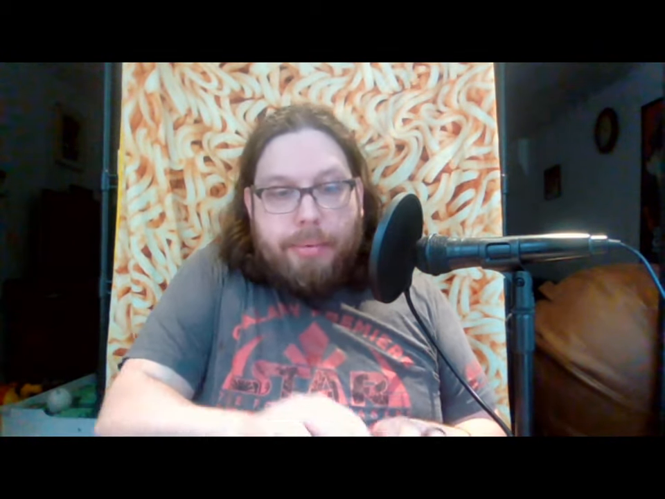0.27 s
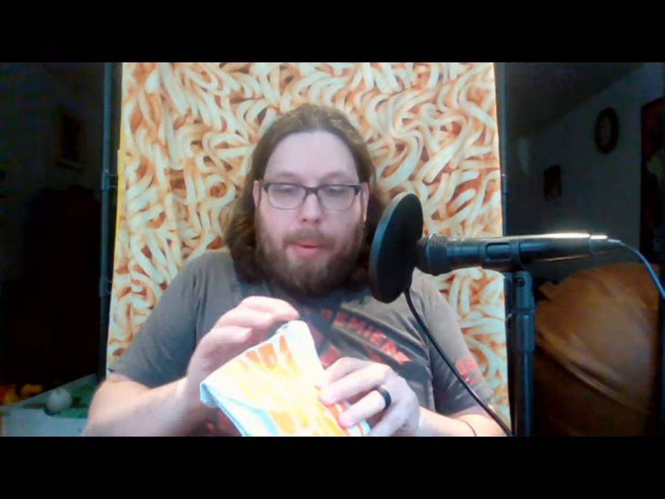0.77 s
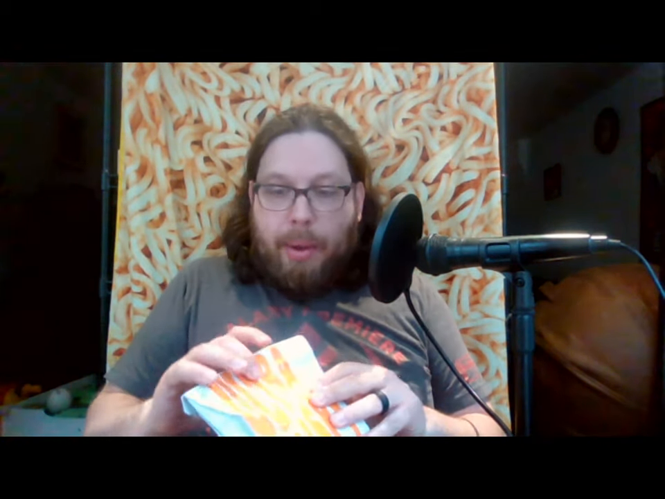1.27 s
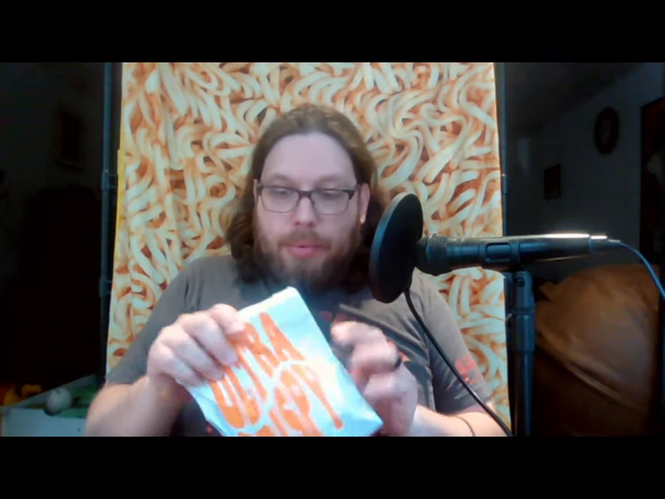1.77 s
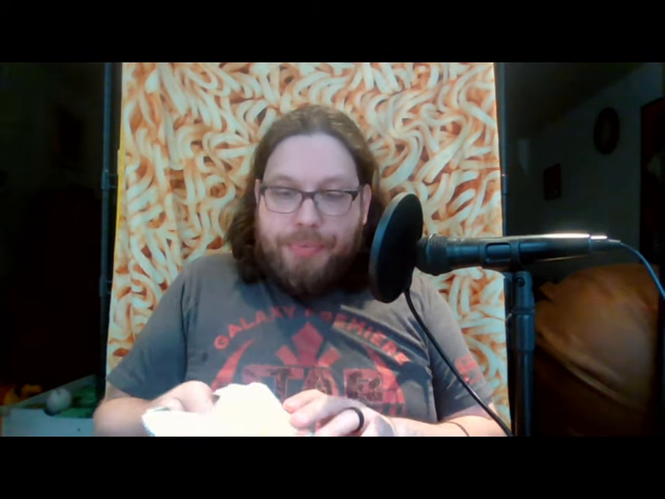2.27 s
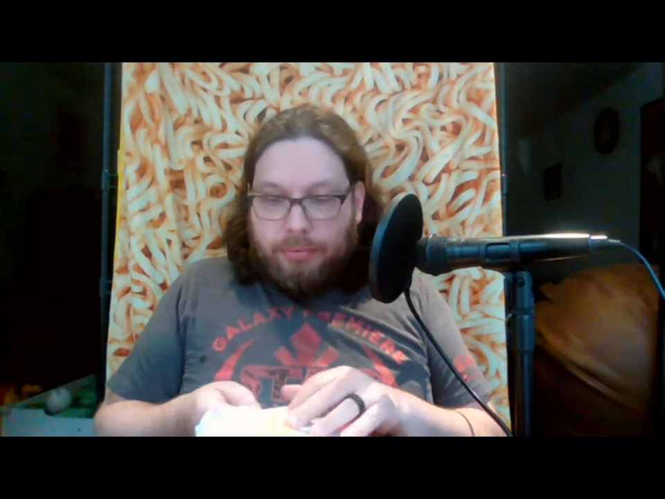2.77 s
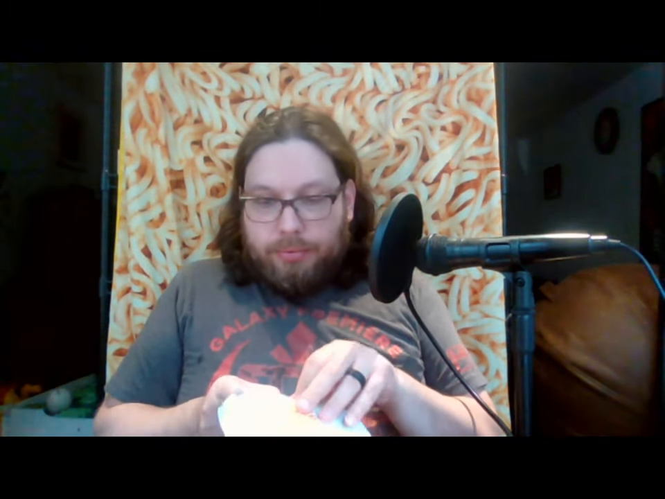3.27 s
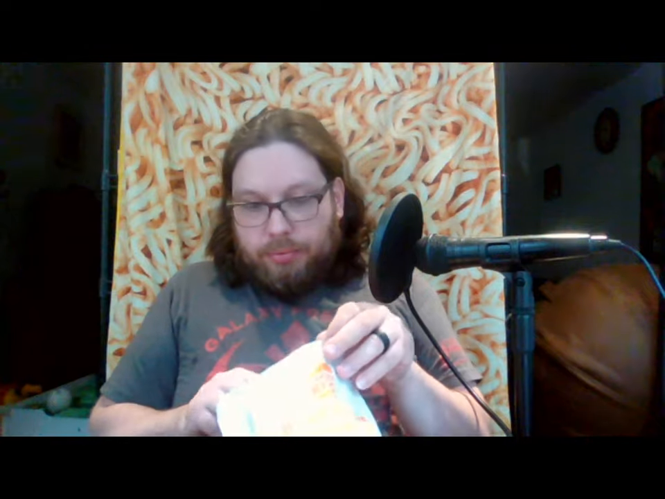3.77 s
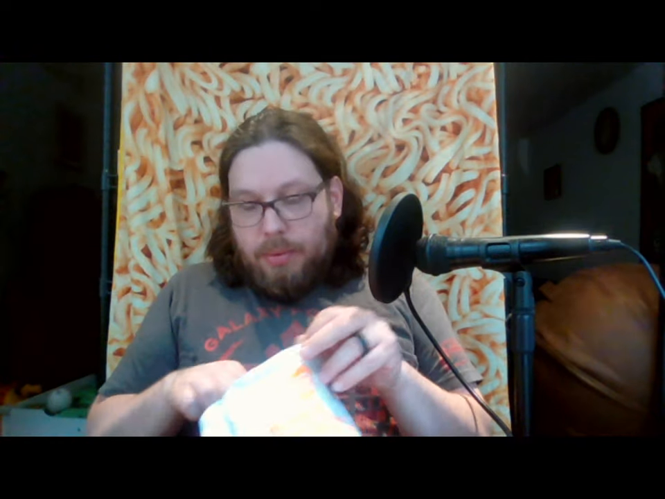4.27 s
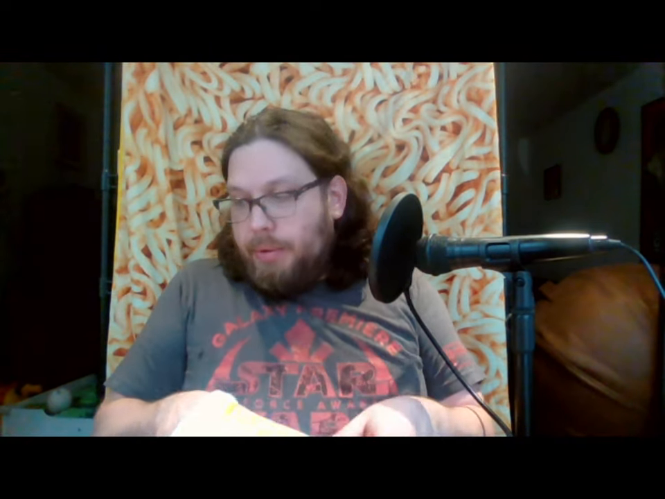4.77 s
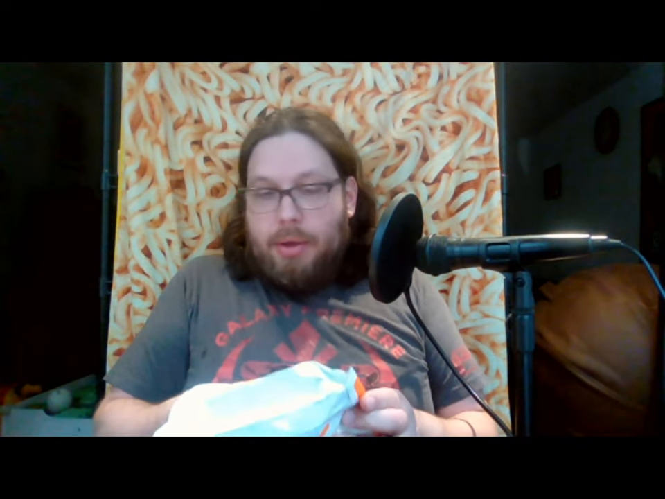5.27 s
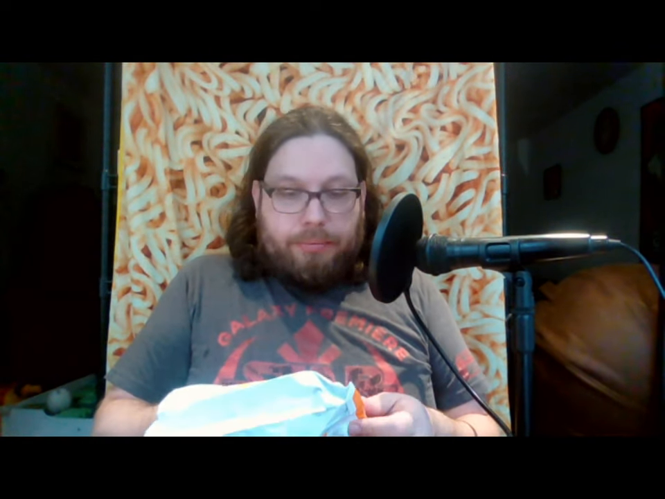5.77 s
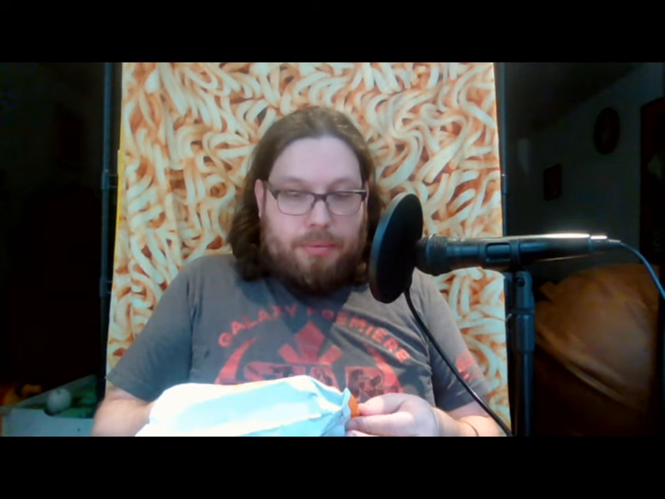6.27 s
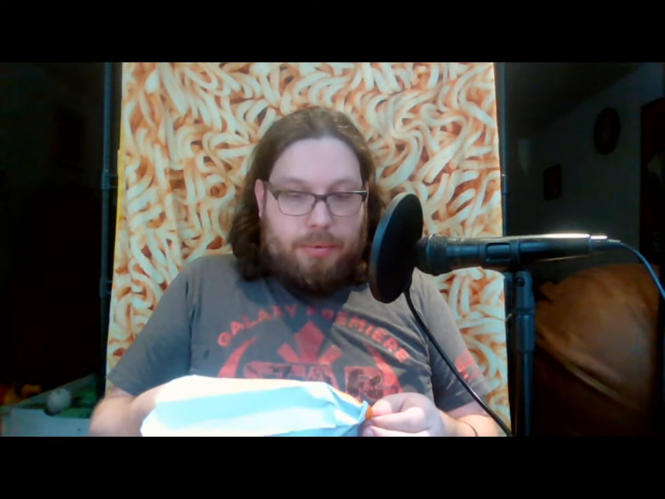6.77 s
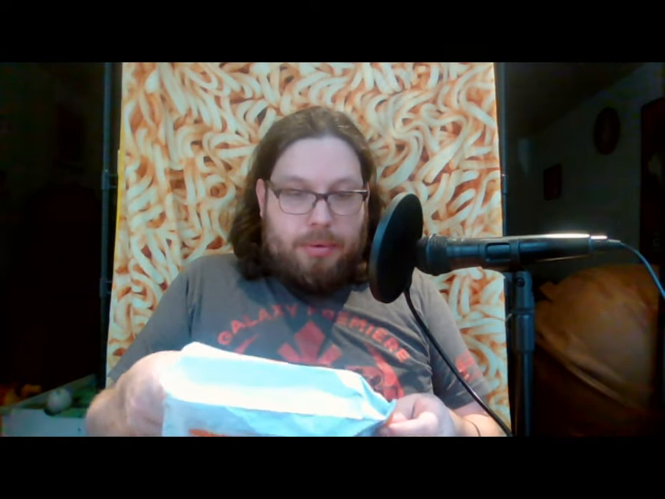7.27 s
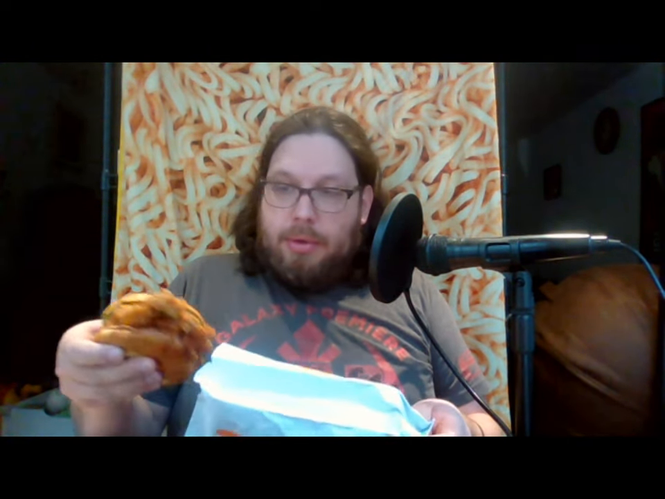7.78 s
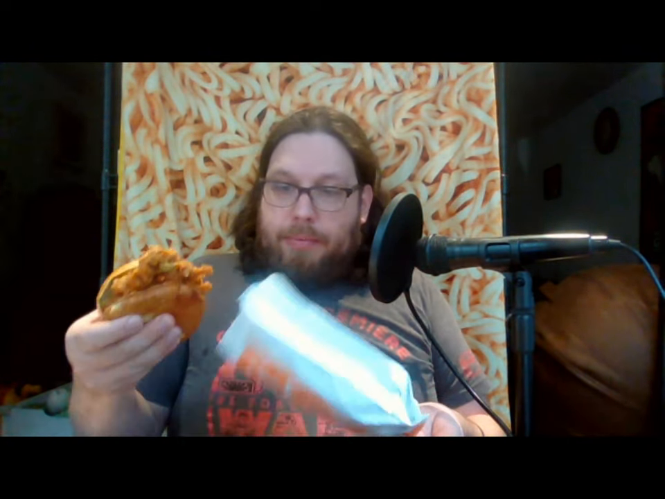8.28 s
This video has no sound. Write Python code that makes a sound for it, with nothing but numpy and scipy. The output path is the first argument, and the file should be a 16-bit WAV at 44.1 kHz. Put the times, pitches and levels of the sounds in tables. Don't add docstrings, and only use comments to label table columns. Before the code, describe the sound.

Waxed paper bag crackles and rustles close to the microphone in a quiet room, with desk thumps and an engine swelling outside before fading.

```python
import sys
import numpy as np
from scipy import signal
from scipy.fft import rfft, irfft, next_fast_len
from scipy.io import wavfile
from scipy.ndimage import uniform_filter1d

SR = 44100
rng = np.random.default_rng(int(sys.argv[2]) if len(sys.argv) > 2 else 0)


def attenuation_scalar(level_db):
    decades = np.asarray(level_db, float) / 20
    return 10 ** decades


def pcm_store(signal):
    levels = np.round(np.clip(np.atleast_2d(signal), -1, 1) * 32767)
    wavfile.write(sys.argv[1], SR, levels.astype(np.int16).T)


N = 375633

# (frequency [Hz], width [Hz], level [dB])
BAG_MODES = [(471.4, 123, 10.5), (787, 1500, -4.5), (1174, 910, -2)]


def noise():
    return rng.standard_normal(N)


def evened(x):
    return x / np.sqrt(np.mean(x ** 2) + 1e-20)


def add(mix, s, sound):
    part = mix[max(round(s * SR), 0):][:len(sound)]
    part += sound[:len(part)]


def curves(rows):
    s, *columns = np.transpose(rows)
    return [np.interp(np.arange(N) / SR, s, c) for c in columns]


def read(points, hz):
    f, value = np.transpose(points)
    return np.interp(np.log(hz + 1), np.log(f + 1), value)


def colour(x, points):
    size = next_fast_len(len(x))
    gain = attenuation_scalar(read(points, np.fft.rfftfreq(size, 1 / SR)))
    return evened(irfft(rfft(x, size) * gain, size)[:len(x)])


def ring(x, modes):
    out = 0
    for hz, width_hz, db in modes:
        out = out + attenuation_scalar(db) * signal.lfilter(*signal.iirpeak(hz, hz / width_hz, SR), x)
    return out


def band(x, lo_hz, hi_hz):
    y = signal.sosfilt(signal.butter(4, [lo_hz, hi_hz], "bandpass", fs=SR, output="sos"), x)
    return y / abs(y).max(axis=-1, keepdims=True)


def flutter(hz, db):
    slow = signal.lfilter(*signal.butter(2, hz, fs=SR), noise())
    return evened(attenuation_scalar(db * evened(slow)))


def swells(rows, rise_s, hold):
    t = np.arange(0, N / SR + .01, .002)
    power = 0
    for s, fall_s, db, *over_db in rows:
        rising = (s - t) / rise_s
        falling = (abs(t - s) / fall_s) ** hold
        shape_db = -20 * np.where(t < s, rising, falling)
        power = power + attenuation_scalar(2 * (db + shape_db + np.array([0] + over_db)[:, None]))
    return [np.interp(np.arange(N) / SR, t, np.sqrt(p)) for p in power]


def room_tone():
    # (frequency [Hz], density [dB per Hz])
    air_spectrum = [(26, -19.5), (45, 6.5), (145, -12), (181, -1), (200, -6), (275, -19.5), (351, -4),
                    (377, -15), (866, -19.5), (1110, -21), (1600, -31), (15500, -55)]
    # (frequency [Hz], level [dB])
    fan_tones = [(344.5, -67), (172.3, -73)]
    air = attenuation_scalar(-54 - 5.5) * colour(noise(), air_spectrum)
    hiss = attenuation_scalar(-86) * noise()
    turning_s = np.cumsum(flutter(hz=2, db=.03)) / SR
    hum = sum(attenuation_scalar(db) * np.sqrt(2) * np.sin(2 * np.pi * hz * turning_s) for hz, db in fan_tones)
    return air + hiss + hum


def engine():
    # (time [s], firing rate [Hz], firing tone [dB], next order up [dB])
    speeding_up = [
        (.8, 99.7, -65, -70),
        (1.0, 102, -58, -60),
        (1.3, 106.4, -58, -52),
        (1.701, 112.6, -60.5, -49.5),
        (2.0, 117.1, -50.5, -52.5),
        (2.301, 124.8, -47, -60.5),
    ]
    # (time [s], firing rate [Hz], firing tone [dB], next order up [dB])
    booming = [
        (2.35, 125.8, -43, -51),
        (2.552, 125.9, -34, -57),
        (2.79, 129.3, -36, -46),
        (3.16, 127.7, -38, -61),
        (3.19, 128.6, -43.5, -60),
        (3.266, 127, -35, -61),
        (3.4, 127.6, -37.5, -61),
        (3.65, 124.5, -62, -69),
    ]
    # (multiple of the cycle [1], level under the next order [dB])
    other_orders = [(4, -38.5), (5, -36.5), (8, -6), (9, -37.5), (10, -24), (12, -11.5)]
    hz, firing_db, next_db = curves([(.7, 98, -90, -90)] + speeding_up + booming + [(3.8, 124, -90, -90)])
    cycle = 2 * np.pi * np.cumsum(hz) / SR / 6
    out = attenuation_scalar(firing_db) * np.sin(6 * cycle)
    out += attenuation_scalar(next_db) * np.sin(7 * cycle)
    for k, db in other_orders:
        out += attenuation_scalar(next_db + db) * np.sin(round(k) * cycle + 6 * rng.random())
    return np.sqrt(2) * out


def leaning():
    # (peak time [s], time to fall 20 dB [s], arm sway [dB], desk rumble over the sway [dB])
    leans = [(.07, .5, -49.5, 3.5), (.19, 0.34, -55.5, 11.5), (.4, .9, -44, -3), (.72, .25, -39.5, 0),
             (.87, 2, -50, 1), (1.6, 4, -54.5, 4.5), (2.29, 0.11, -33, 0.5), (2.32, .8, -30, -21),
             (3.15, 1.4, -46, -6.5), (3.6, 0.6, -41, -9.5), (3.92, 0.44, -60.5, 16.5), (4.2, 0.3, -50, 6),
             (4.515, .35, -35.5, -10.5), (4.77, 0.18, -32.5, -6.5), (4.89, 0.49, -42, 4),
             (5.3, 5.5, -61, 7), (7.235, 0.45, -48, -0.5), (7.5, 1.5, -60.5, 9)]
    # (frequency [Hz], width [Hz], level [dB])
    arm_modes = [(32.54, 3, -10), (62.3, 50, -30)]
    push, shake = swells(leans, rise_s=0.081, hold=0.99)
    sway = evened(ring(ring(noise(), arm_modes), [(37, 35, 0)]))
    lumpy = noise() * flutter(hz=25, db=2)
    rumble = evened(ring(ring(lumpy, DESK_MODES), [(158, 425, 0)]))
    return push * sway + shake * rumble


# (frequency [Hz], width [Hz], level [dB])
DESK_MODES = [(104, 89, -1.5), (130.4, 24, 1), (180, 29, 2), (244, 36, -4), (322, 41, -8)]


def knocks():
    # (time [s], peak level [dB], pitch [Hz], time to fall 60 dB [s])
    bumps = [(.07, -38, 200, .05), (.165, -36, 240, .06), (.52, -36, 150, .06), (5.24, -36, 130, .06),
             (0.671, -30, 180, 0.054), (1.013, -37, 260, 0.048), (1.148, -33, 205, 0.04),
             (1.744, -31.5, 137, 0.069), (2.276, -23.5, 158, 0.059), (2.294, -28, 260, 0.079),
             (4.734, -25.5, 295, 0.081), (4.749, -20, 61.6, 0.2), (4.752, -25, 201, 0.068),
             (4.761, -20.5, 95, 0.054), (4.89, -27, 172, 0.073), (7.217, -26, 194, 0.034),
             (7.402, -40, 116, 0.054)]
    out, t = np.zeros(N), np.arange(9000) / SR
    for s, db, hz, t60 in bumps:
        thud = np.sin(2 * np.pi * hz * t) * attenuation_scalar(-60 * t / max(t60, .02))
        thud = thud * np.minimum(t / 0.0031, 1)
        thud = thud + 5.3 * ring(thud, DESK_MODES)
        add(out, s, attenuation_scalar(db) * thud / abs(thud).max())
    return out


def walls(x):
    # (frequency [Hz], time to fall 60 dB [s])
    decay = [(300, 0.38), (1000, 0.099), (4000, 0.057), (12000, 0.09)]
    taps, at = np.zeros(SR // 2), np.arange(220, SR // 2 - 20, 20)
    taps[at + rng.integers(0, 20, len(at))] = rng.choice([-1., 1.], len(at))
    hz, t, z = signal.stft(taps, SR, nperseg=128)
    fading = attenuation_scalar(-60 * t / read(decay, hz)[:, None])
    tail = signal.istft(z * fading, SR, nperseg=128)[1]
    return signal.fftconvolve(x, tail / np.linalg.norm(tail))[:N]


def crinkle(patches_hz):
    out, grip = np.zeros(N), flutter(hz=35, db=1.6)
    for hz in patches_hz:
        strength = attenuation_scalar(4 * np.minimum(rng.exponential(1, N), 4))
        ticks = strength * (rng.random(N) < 90 / SR)
        ticks = signal.lfilter([1], [1, -.98], ticks)
        drive = (1 + .75 * evened(ticks)) * noise() * grip
        out += ring(drive, [(hz, 0.65 * hz, 0)]) / np.sqrt(hz)
    return out


def rustle():
    # (peak time [s], time to fall 20 dB
    # [s], level [dB], dry skin over the paper [dB])
    finger_strokes = [(.223, 0.3, -61.5, -5), (.36, 0.2, -59, 0), (.45, 0.33, -54.5, 1), (.6, 0.29, -57.5, 4),
                      (.79, 0.08, -58, 6), (.97, 0.15, -57, -3), (1.09, .07, -61, -6), (1.18, 0.09, -58, 0),
                      (1.27, 0.04, -52, 2), (1.36, .06, -60, 5), (1.453, 0.03, -58, -6), (1.598, 0.12, -49.5, -7),
                      (1.69, 0.13, -49.5, -8.5), (1.754, 0.03, -52, -11), (1.834, 0.2, -52.5, -9.5),
                      (1.956, 0.21, -51.5, -3), (2.101, 0.3, -49.5, -9), (2.287, 0.09, -52, -21),
                      (2.5, 0.33, -55.5, -6.5), (2.62, 0.11, -55, -5), (2.769, 0.02, -56, -4.5),
                      (2.845, 0.02, -55, 3), (2.92, .12, -63, -2), (3.03, 0.08, -56, 1), (3.156, .035, -52, -6),
                      (3.21, .08, -64, -2), (3.27, 0.05, -62, 1), (3.35, 0.1, -60, 4), (3.45, .12, -60, 3),
                      (3.615, 0.06, -58, -9), (3.674, .1, -52, -9), (3.791, 0.032, -44.5, -20),
               (3.86, .3, -59.5, -22), (3.93, 0.2, -54, -16), (4.2, 0.091, -59, -6),
               (4.292, 0.094, -54.5, -8.5), (4.408, 0.22, -50.5, -12), (4.8, .04, -49, -12),
               (4.84, 0.05, -46, -12), (4.89, 0.075, -41, -9), (4.98, 0.07, -48, -6), (5.05, .05, -49, -6),
               (5.085, 0.09, -51, -8), (5.19, .05, -55, -10), (5.245, .07, -45, -12), (5.3, .07, -50, -10),
               (5.385, 0.2, -57, -15), (5.591, 0.15, -55.5, -16), (5.84, 0.14, -63, -11),
               (6.062, 0.078, -60.5, -22), (6.285, 0.06, -63, 1), (6.405, 0.075, -65.5, -6.5),
               (6.615, 0.13, -57.5, -17.5), (7.066, 0.18, -69, -12), (7.43, 0.1, -62, -16),
               (7.525, .06, -62, -14), (7.572, 0.09, -57, -14), (7.697, .04, -56, -12),
               (7.778, 0.041, -62, -7), (7.845, 0.07, -65, -20)]
    # (time [s], level [dB])
    squeezing = [(0, -65.5), (.3, -63.5), (.75, -51), (.92, -67), (1.0, -56.5), (1.45, -68.5), (1.6, -56.5),
                 (2.25, -51.5), (2.4, -62), (3.1, -59), (4.0, -55), (4.2, -64), (4.7, -70), (4.9, -48),
                 (5.15, -57), (5.7, -64.5), (8.5, -66)]
    # (frequency [Hz], density [dB per Hz])
    paper_spectrum = [(710, -35), (1200, -1.5), (2260, -3), (2490, -0.5), (4880, 1), (7000, -18),
                      (9100, -29), (15400, -120)]
    skin_spectrum = [(2400, -11), (4000, -1.5), (6500, -2), (9000, -6), (12000, -25), (16000, -55)]
    resting_db = [-73.5, -77.5]

    strokes = [row + (-7.5 - 0.45 * row[-1],) for row in finger_strokes]
    paper, dry_skin, folds = swells(strokes, rise_s=0.048, hold=1.85)
    folds = np.hypot(attenuation_scalar(curves(squeezing)[0]), folds)

    sheet = np.diff(crinkle(np.geomspace(1300, 12000, num=5)), prepend=0)
    sheet = colour(sheet, [(1000, 1), (12000, -8)])
    hollow = evened(ring(ring(noise(), BAG_MODES), [(750, 2800, 0)])) * flutter(hz=39.3, db=3.5)

    resting = sum(attenuation_scalar(db) * colour(noise(), shape)
                  for db, shape in zip(resting_db, [paper_spectrum, skin_spectrum]))
    ducking = 1 + uniform_filter1d(paper, round(.6 * SR)) / attenuation_scalar(-55.5)

    out = attenuation_scalar(-0.3) * paper * colour(sheet, paper_spectrum)
    out += attenuation_scalar(2.16) * dry_skin * colour(sheet, skin_spectrum)
    return out + folds * hollow + resting / ducking


def drags():
    # (time [s], length [s], level [dB], centre [Hz])
    finger_drags = [(6.62, 0.13, -59, 3400), (0.57, .09, -51, 4500), (.25, .07, -56, 4000),
                    (.45, .1, -55, 3600), (2.88, .1, -60, 4200), (3.06, .06, -55, 4800),
                    (3.18, .18, -55, 900), (3.32, .07, -57, 5200), (3.41, .1, -56, 4600),
                    (3.42, .17, -58, 850), (1.2, .18, -61, 700), (5.59, .05, -52, 3200),
                    (7.388, .025, -54, 1300), (7.39, .02, -60, 3200), (7.68, .05, -55, 1500),
                    (7.68, .04, -57, 3200), (7.68, .05, -59, 5000), (7.76, .035, -59, 1700),
                    (7.76, .035, -62, 5300), (7.8, .17, -73, 3850), (7.6, .05, -60, 1100),
                    (7.635, .03, -54, 1300), (7.47, .06, -58, 1500), (7.04, .06, -66, 3500)]
    out = np.zeros(N)
    for s, length_s, db, hz in finger_drags:
        hiss = ring(rng.standard_normal(8000), [(hz, 0.45 * hz, 0)])
        hiss = ring(hiss, [(hz, 0.67 * hz, 0)])[:int(length_s * SR)]
        add(out, s, attenuation_scalar(db) * evened(hiss) * signal.windows.tukey(len(hiss), .5))
    return out


def snaps():
    # (time [s], peak level [dB], panel ring [Hz],
    # hollow body under the peak [dB])
    cracking = [(.392, -26, 4270, -16), (.437, -21, 2300, -40), (.438, -12.5, 3400, -35),
                (.658, -23.5, 3400, -13), (.676, -30, 1010, -11), (.828, -29.5, 1070, -11),
                (.967, -38, 960, 6.5), (1.266, -33, 4150, -5.5), (1.59, -17.5, 3030, -11),
                (1.825, -23, 4020, -11), (1.938, -25.5, 1800, -14), (1.942, -20, 5450, -8),
                (1.993, -21, 3300, -10), (2.016, -26.5, 4100, -18), (2.278, -31, 2800, -20),
                (2.616, -17.5, 4760, -15.5), (3.778, -36, 4200, -19), (4.397, -31, 1270, 1),
                (4.415, -28.5, 1670, -19), (4.524, -31, 2380, -4), (4.861, -28, 3340, -16),
                (4.884, -14.5, 3460, -11), (4.989, -25, 4300, -30), (5.044, -23, 5190, -10),
                (5.276, -24, 2600, -12), (5.579, -17.5, 4400, -40), (5.579, -22, 2600, -30)]
    snapping = [(.216, -27.5, 4200, -10), (.311, -32.5, 4040, -18), (.35, -24, 3360, -35.5),
                (.387, -30.5, 6300, -14), (.711, -37, 3730, -7), (1.169, -36, 4830, -3),
                (1.573, -32, 2860, -16), (1.752, -21, 2580, -11), (1.928, -28, 4240, -21),
                (1.96, -11.5, 4655, -35), (1.96, -20, 1400, -15), (2.082, -25, 1600, -19),
                (2.298, -33.5, 3240, -5), (3.171, -26, 880, -29), (3.411, -29, 895, -1),
                (3.786, -25, 1900, -13), (4.282, -28.5, 2540, -5.5), (4.39, -31, 4150, -12),
                (4.801, -34, 802, 0), (4.837, -23.5, 3330, -12), (6.055, -30.5, 2600, -12)]
    popping = [(.737, -36.5, 1560, 2.5), (.748, -34, 2030, -12), (.761, -35, 1530, -6),
               (.793, -35, 1290, -9), (1.137, -35.5, 1640, -12), (1.678, -26.5, 2820, -9),
               (1.851, -37, 1800, -17), (2.073, -28, 2800, -26), (2.127, -26.5, 5030, -25),
               (2.601, -32.5, 1007, -29), (3.663, -29.5, 794, -13), (4.46, -36, 2600, -27),
               (4.48, -34.5, 3600, -12), (4.87, -14.5, 4200, -18), (4.958, -27, 1500, -3),
               (4.976, -29.5, 3950, 4), (5.134, -26, 3200, -14), (5.295, -22.5, 4150, -18),
               (5.375, -26, 2400, -10), (7.524, -37.5, 1400, -1)]
    denting = [(2.099, -14.5, 4400, -15), (2.546, -34.5, 4165, -5), (2.553, -30.5, 2490, -11),
               (3.056, -21, 4100, -21), (3.683, -33.5, 1300, -3), (3.785, -22.5, 4560, -11),
               (3.848, -33, 765, 4.5), (3.905, -32.5, 774, -16), (3.918, -22, 1090, -7),
               (3.986, -26.5, 1080, -35), (4.009, -32.5, 3700, -20), (4.032, -41, 1020, 15.5),
               (4.075, -30, 2000, -26), (4.825, -20.5, 3070, -16), (5.074, -19.5, 4370, -40),
               (5.215, -31, 1040, -1.5), (5.237, -19.5, 3340, -10), (5.325, -33, 1410, -13.5),
               (6.063, -28.5, 1480, -2), (5.468, -31, 4160, -32), (5.532, -31.5, 3000, -7),
               (5.863, -31, 1300, -20), (6.605, -28, 2810, -36), (7.398, -33.5, 1720, -5),
               (7.573, -33.5, 1710, -18), (7.84, -44, 1016, 0.5)]
    ticking = [(.138, -46, 1500, -15), (.337, -38, 5890, -20), (.373, -42, 6500, -25), (1.017, -40, 900, 0),
               (1.254, -39, 1940, -12), (1.338, -46, 3340, -15), (1.352, -41, 4170, -15),
               (1.518, -40, 2200, -5), (1.658, -37, 1100, -8), (1.695, -31, 3700, -15),
               (1.735, -37, 3690, -15), (1.806, -39, 1090, -8), (1.881, -37, 2900, -15),
               (2.158, -36, 2300, -15), (2.2, -37, 2500, -12), (2.223, -39, 1740, -12),
               (2.239, -35, 2500, -15), (2.353, -40, 2450, -15), (2.723, -38, 1340, -3),
               (2.768, -38, 3600, -15), (2.776, -38, 3300, -15), (3.171, -29, 4200, -30),
               (2.903, -41, 3800, -15), (3.017, -34, 4470, -15), (3.033, -35, 4310, -20),
               (3.154, -38, 5000, -8), (3.275, -40, 4700, -8), (3.329, -40, 4100, -8),
               (3.355, -41, 3900, -15), (3.435, -38, 4070, -5), (3.482, -39, 4700, -15),
               (3.527, -40, 2000, -6), (3.664, -32, 3900, -20), (3.721, -37, 3800, -15),
               (3.736, -38, 3700, -3), (3.877, -36, 2400, -8)]
    late_ticking = [(4.207, -40, 3200, -20), (4.32, -37, 2000, -10), (4.348, -42, 1070, -5),
                    (4.624, -42, 2430, -12), (4.033, -31, 1900, -20), (4.876, -35, 450, 3),
                    (4.902, -31, 450, 3), (4.925, -38, 400, 2), (4.963, -30, 2000, -10),
                    (4.992, -37, 450, 3), (5.013, -38, 450, 2), (5.052, -37, 400, 0),
                    (5.176, -41, 3610, -15), (5.184, -36, 1900, -10), (5.212, -33, 3910, -20),
                    (5.445, -43, 1200, -8), (5.453, -38, 1600, -5), (5.489, -39, 1500, -8),
                    (5.538, -36, 3000, -15), (5.827, -42, 2000, -8), (5.865, -36, 4500, -25),
                    (5.911, -43, 3000, -10), (6.229, -46, 1990, -10), (4.492, -31, 1700, -3),
                    (7.554, -40, 1900, -15), (7.555, -44, 4300, -25), (7.606, -45, 1100, -5),
                    (7.683, -42, 1810, -12), (7.688, -38, 3200, -12), (7.704, -40, 1500, -10),
                    (7.704, -42, 5000, -25), (3.918, -28, 3400, -30), (7.774, -43, 1810, -15),
                    (7.785, -45, 3500, -15)]
    crispness = [-15.5, -23.5, -28, -40, -38, -42]
    kinds = [cracking, snapping, popping, denting, ticking, late_ticking]
    creases = [row + (crisp_db,) for rows, crisp_db in zip(kinds, crispness) for row in rows]

    out, t = np.zeros(N), np.arange(1400) / SR
    chance = rng.standard_normal((len(creases), len(t)))
    slips = chance * np.minimum(t / 0.0005, 1) * attenuation_scalar(-60 * t / 0.013)
    edge_slips = chance * np.minimum(t / 0.00039, 1) * attenuation_scalar(-60 * t / 0.016)
    hollows = band(ring(slips, BAG_MODES), 298, 1033)
    sheets = .55 * band(slips, 1500, 6500)
    crisp = band(edge_slips, 6210, 8890) + 0.2 * band(edge_slips, 9500, 13000)
    for k, (s, db, hz, body_db, crisp_db) in enumerate(creases):
        snap = band(slips[k], 0.728 * hz, 1.172 * hz)
        snap = snap + 1.77 * band(slips[k], 0.33 * hz, min(1.81 * hz, 5400))
        snap = snap + sheets[k] + attenuation_scalar(body_db + 5.5) * hollows[k] + attenuation_scalar(crisp_db + 12.0) * crisp[k]
        add(out, s, attenuation_scalar(db - 5.5) * snap)
    return out


def scene():
    background = room_tone() + engine()
    desk = leaning() + knocks()
    close = snaps() + drags()
    return (background + desk + rustle() + close + attenuation_scalar(-12.5) * walls(close))[None]


def low_pass(x):
    return signal.sosfilt(signal.butter(12, 16380, fs=SR, output="sos"), x)


def record(dry):
    return low_pass(dry)


dry = scene()
out = record(dry)
pcm_store(out)
```